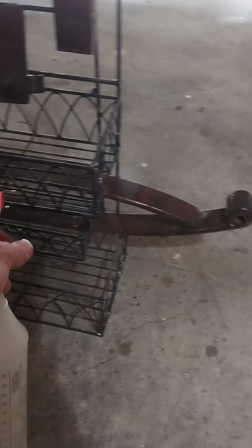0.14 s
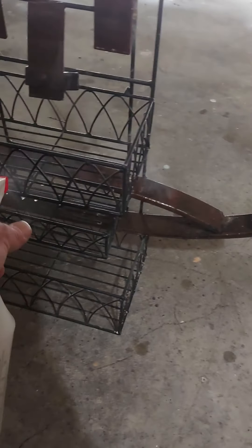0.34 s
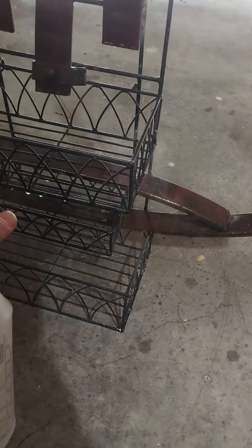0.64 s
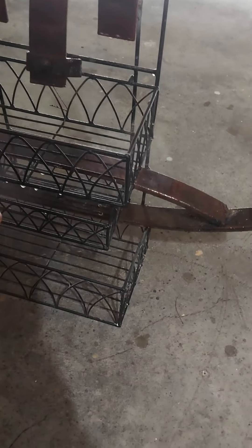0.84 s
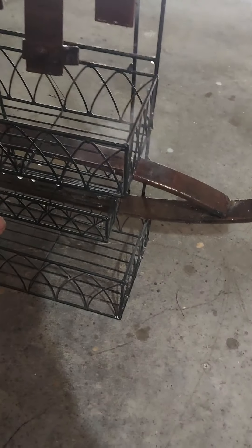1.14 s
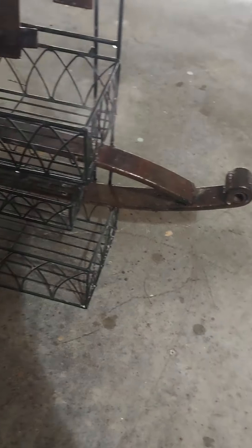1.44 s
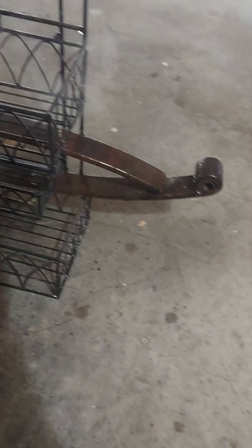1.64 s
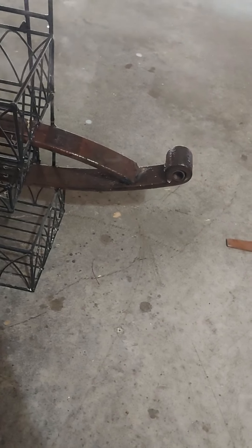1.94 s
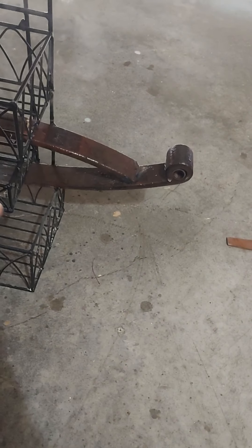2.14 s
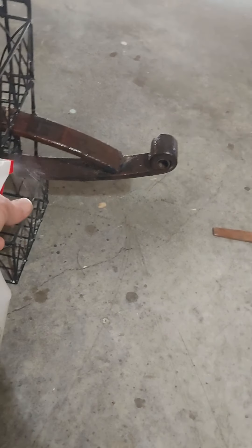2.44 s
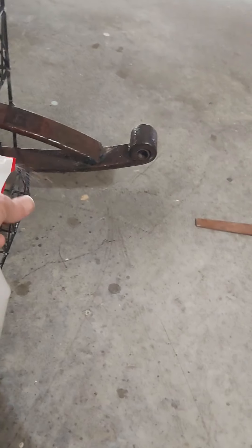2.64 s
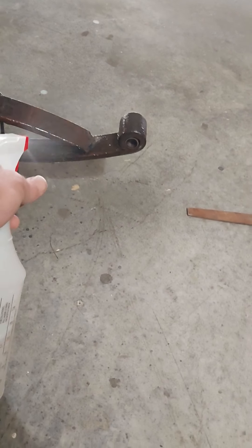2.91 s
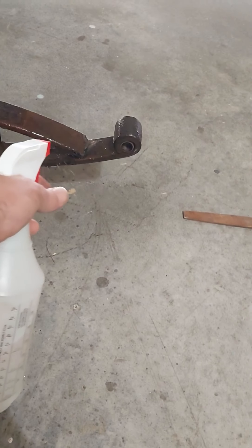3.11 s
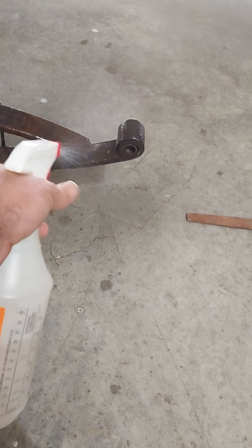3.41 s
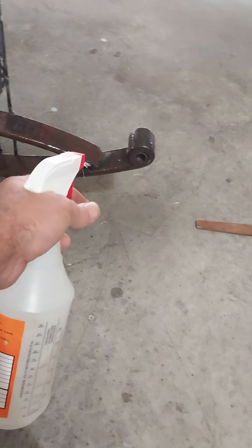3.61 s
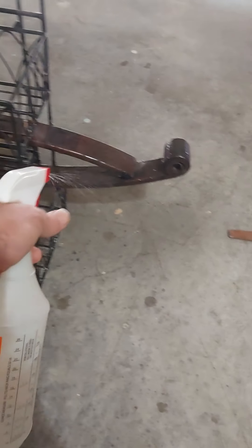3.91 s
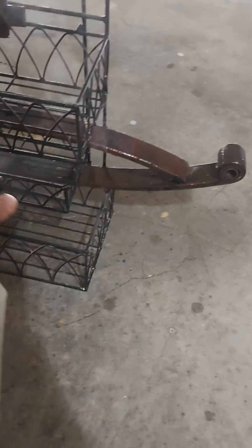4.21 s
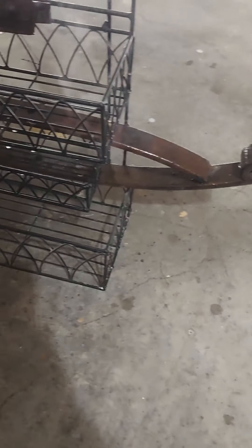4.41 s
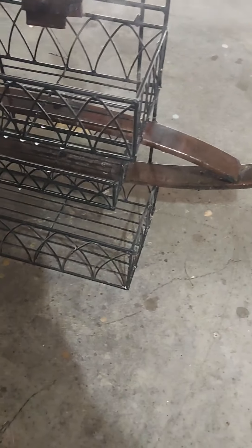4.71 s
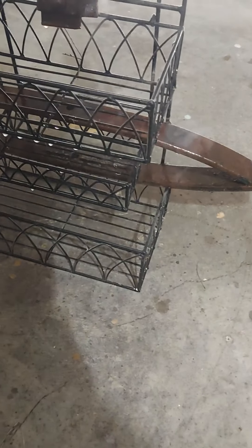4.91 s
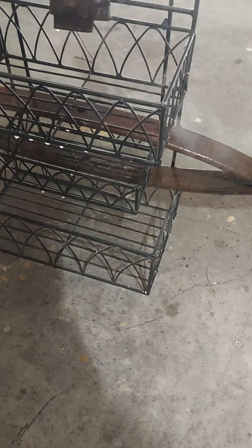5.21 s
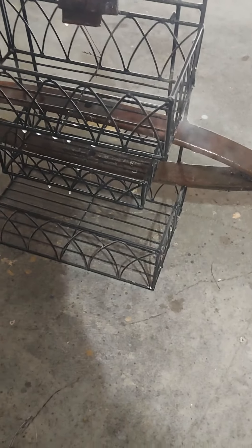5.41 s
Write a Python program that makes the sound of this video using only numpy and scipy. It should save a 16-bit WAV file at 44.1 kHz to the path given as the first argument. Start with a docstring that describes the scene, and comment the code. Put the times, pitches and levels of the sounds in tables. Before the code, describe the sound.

A plastic trigger bottle is pumped steadily, about twice a second, hissing wet bursts of mist onto steel over a faint garage hum.

```python
"""A bare garage with a concrete floor; a two-port phone is held beside a plastic trigger bottle while a motor hums.
From the start, a little over twice a second, a squeeze hisses through the nozzle, with spits as the jet starts,
at its fullest and as the pressure dies, and patters onto a steel spring. On each release the trigger clicks, the
pump slurps full, the piston knocks home and a valve ticks. Liquid sloshes now and then; the pump snaps hard near
1.9 s and 2.7 s, the second time leaving a low boom, and a faint whine follows from 3 s. All is noise and sines."""
import sys
import numpy as np
from scipy import signal
from scipy.fft import rfft, irfft, next_fast_len
from scipy.io import wavfile
from scipy.ndimage import uniform_filter1d

SR = 44100
rng = np.random.default_rng(int(sys.argv[2]) if len(sys.argv) > 2 else 0)


def unload_wav(signal):
    """Save mono or channel-first audio to the path in sys.argv[1] as 16-bit WAV at rate SR, clipped to [-1, 1]."""
    wavfile.write(
        sys.argv[1],
        SR,
        np.round(np.clip(np.atleast_2d(signal).T, -1, 1) * 32767).astype(np.int16),
    )


N = 244755  # samples
T = np.arange(N) / SR  # time [s]


def undb(db):
    """Decibels to gain."""
    return 10 ** (np.asarray(db) / 20)


def noise():
    """White noise as long as the scene."""
    return rng.standard_normal(N)


def walk(rate):
    """Smooth random wander with unit spread, drawn about rate times a second."""
    step = max(int(SR / rate), 1)
    stairs = np.repeat(rng.standard_normal(N // step + 1), step)
    wander = uniform_filter1d(stairs, step)[:N]
    return wander / wander.std()


def crackle(per_s):
    """Sparse tiny pops of random size, with unit power."""
    pops = noise() * (rng.random(N) < per_s / SR)
    return pops / pops.std()


def fade(start, t60):
    """A sudden start that dies by 60 dB in t60."""
    age = T - start
    return (age >= 0) * np.exp(-np.log(1000) * np.clip(age / t60, 0, 10))


def shape(x, points, unit=True):
    """Causal minimum-phase filter through (Hz, dB) points; with unit it keeps the power of white noise."""
    size = 4096
    hz, db = np.transpose(points)
    log_grid = np.log(np.fft.rfftfreq(size, 1 / SR) + 1)
    gain = undb(np.interp(log_grid, np.log(hz), db))
    # folding the cepstrum onto positive time makes the response causal
    cepstrum = irfft(np.log(gain))[:size // 2]
    response = irfft(np.exp(2 * rfft(cepstrum, size) - cepstrum[0]))
    if unit:
        response = response / np.linalg.norm(response)
    return signal.oaconvolve(x, response)[:N]


def band(x, low_hz, high_hz):
    """Gentle band-pass."""
    return signal.sosfilt(signal.butter(2, [low_hz, high_hz], "band", fs=SR, output="sos"), x)


def glance(x, lag_s, gain, sway):
    """A reflection off something close; its path changes as the hands move and sweeps notches through the sound."""
    late = np.interp(T - lag_s * np.exp(sway * walk(3)), T, x)
    return (x + gain * late) / np.hypot(1, gain)


# how far the right port trails the left for sound from the bottle: (frequency [Hz], lag [cycles])
PORT_LAG = [(0, 0), (800, .08), (1200, .35), (1400, .9), (2000, 1.0), (2500, 1.48), (3800, 1.6),
            (4700, 2.0), (6200, 2.2), (7000, 2.5), (8000, 2.6), (9500, 3.0), (16000, 5.0)]


def spread(make, shared):
    """Two ports hear partly the same sound, the right one a little later."""
    shared, common = np.clip(shared, 0, 1), make()
    size = next_fast_len(N)
    cycles = np.interp(np.fft.rfftfreq(size, 1 / SR), *np.transpose(PORT_LAG))
    right = irfft(rfft(common, size) * np.exp(-2j * np.pi * cycles), size)[:N]
    together = np.array([common, right])
    separate = np.array([make(), make()])
    return np.sqrt(shared) * together + np.sqrt(1 - shared) * separate


# spectrum of the room's rumble: (frequency [Hz], density [dB per Hz])
ROOM_AIR = [(20, -16), (40, -7.5), (62, -5.5), (85, 0), (130, -8), (220, -15.5), (400, -25.5), (580, -26.5),
            (800, -23), (1200, -30), (2100, -33.5), (4200, -38.5), (9500, -47), (15000, -50.5)]


def background(hum_hz=58.9, hum_db=-50.5, air_db=-58, early_db=3, wide_hz=1100, stir_db=3.0):
    """A motor hums over the room's rumble, whose low middle stirs and eases after the first seconds."""
    phase = 2 * np.pi * np.cumsum(hum_hz + .5 * walk(3.8)) / SR
    hum = np.sqrt(2) * undb(hum_db + .5 * walk(6.5)) * np.sin(phase)
    mid = shape(noise(), ROOM_AIR)
    # the ports differ only in the upper part of the rumble
    side = signal.lfilter(*signal.butter(1, wide_hz, "high", fs=SR), shape(noise(), ROOM_AIR))
    air = np.array([mid + side, mid - side])
    swell = early_db * np.interp(T, [0, .9, 1.7, 2.6], [1.1, 1.7, 2.65, 0.42]) + stir_db * walk(7.5)
    low_middle = signal.filtfilt(*signal.butter(1, [130, 1100], "band", fs=SR), air)
    return hum + undb(air_db) * (air + low_middle * (undb(swell) - 1))


# squeezes of the trigger: (time of full pressure [s], level [dB], hold [s], sag [dB per s])
SQUEEZES = [(-.02, -40.5, 0.032, 167), (0.365, -38, 0.039, 178), (0.795, -35.5, .009, 156),
            (1.245, -38.5, 0.031, 162), (1.698, -39, 0.018, 123), (2.113, -39.5, 0.024, 186),
            (2.508, -36.5, .010, 127), (2.927, -37.5, .019, 152), (3.336, -36, 0.0056, 159),
            (3.771, -37, .016, 171), (4.215, -39, 0.017, 132), (4.624, -40, 0.046, 130),
            (5.076, -40, 0.041, 172), (5.481, -38.5, 0.019, 138)]
# loud spits of liquid from the nozzle: (time [s], level [dB], 60 dB decay [s])
SPITS = [(0.332, -36, 0.078), (.480, -39, .02), (0.499, -42, 0.021), (.793, -34, .027), (2.099, -39, .02),
         (2.484, -38, .03), (2.597, -40, .018), (3.316, -41, .019), (3.750, -37.5, .018),
         (4.215, -43, 0.02), (4.332, -38.5, 0.024), (4.61, -39, .037), (4.769, -37.5, .02),
         (5.064, -33, 0.02), (5.484, -42, .027)]
# spectrum of the mist before its treble is tilted: (frequency [Hz], density [dB per Hz])
MIST = [(150, -14.5), (550, -17), (950, -8.5), (1250, -14.5), (1900, -9.5), (2600, -12), (3300, -8.5),
        (4100, -3), (5200, -7.5), (6700, -1), (7700, -3.5), (9200, -1.5), (12500, 0.5), (16000, 2)]
BUILD_S, MIST_TILT_DB = 0.044, -2  # shared by every squeeze


def spray(flutter_db=1.4, surge_db=0.76, grain_db=5.0, onset_db=21, pop_db=4.5, pop_s=0.0029,
          overshoot_db=3.0, overshoot_t60=0.094, shut_s=0.17, shut_db=250, drop_db=-4):
    """Pressure builds, holds and sags; the jet breaks into a hiss of droplets
    and spits as it starts, at its fullest and as the pressure dies."""
    flow = np.zeros(N)
    for s, db, hold, fall in SQUEEZES:
        age = T - s
        # shut_db steepens the sag, in dB per s
        sag = fall * np.maximum(age - hold, 0) + shut_db * np.maximum(age - shut_s, 0)
        # the hiss creeps up, then jumps as the outlet valve pops fully open
        creep = onset_db * np.clip(-age / BUILD_S, 0, 10) ** 1.5
        jump = pop_db * np.clip(-age / pop_s, 0, 1)
        loss = np.minimum(sag + creep + jump, 200)
        flow += undb(db - loss + overshoot_db * fade(s, overshoot_t60))
    flow = flow * undb(flutter_db * walk(220) + surge_db * walk(60))
    loud_spits = sum(undb(db) * fade(s, t60) for s, db, t60 in SPITS)
    spits = np.hypot(sputter(), loud_spits)

    def droplets():
        grains = noise() * undb(grain_db * walk(5000))
        grains = grains / grains.std() + undb(drop_db) * crackle(per_s=1300)
        hiss = shape(grains * np.hypot(flow, spits), MIST)
        # the hiss glances off the hand, then off the steel and the floor
        hiss = glance(hiss, lag_s=0.000695, gain=0.22, sway=0.247)
        hiss = glance(hiss, lag_s=.0022, gain=0.18, sway=0.069)
        hiss = glance(hiss, lag_s=.0055, gain=0.23, sway=0.0097)
        treble = signal.filtfilt(*signal.butter(2, 9000, "high", fs=SR), hiss)
        # the treble flickers
        return treble * undb(MIST_TILT_DB + walk(170)) + (hiss - treble) * undb(-MIST_TILT_DB)
    return spread(droplets, shared=0.56)


def sputter(from_s=0.075, to_s=.15, level_db=-11, scatter_db=1.5, t60=0.021, count=2):
    """Level of the small spits that come at random as the pressure dies."""
    out = np.zeros(N)
    for s, db, *_ in SQUEEZES:
        for late, size in zip(rng.random(count), rng.standard_normal(count)):
            start = s + from_s + late * (to_s - from_s)
            out += undb(db + level_db + scatter_db * size) * fade(start, t60)
    return out


def patter(delay_s=0.15, width_s=0.067, level_db=-60, low_hz=1500, high_hz=4800, splat_t60=.012):
    """The heavier drops land on the steel a moment after each squeeze."""
    landing = sum(np.exp(-((T - s - delay_s) / width_s) ** 2) for s, *_ in SQUEEZES)
    decay = np.exp(-np.log(1000) / (splat_t60 * SR))  # per sample
    splats = signal.lfilter([1], [1, -decay], np.abs(crackle(per_s=90)))
    splats = landing * splats / np.sqrt(np.mean(splats ** 2))
    return undb(level_db) * spread(lambda: band(noise() * splats, low_hz, high_hz), shared=0.47)


# releases of the trigger; the click and tick levels stand before the trim in clicks():
# (time [s], click level [dB], click treble against its middle [dB], valve tick level [dB], piston stop level [dB])
RELEASES = [(0.1521, -40, -13, -51, -45.5), (0.5629, -34, -8, -49.5, -44.5), (0.9885, -37, -6, -49.5, -43),
            (1.4349, -36.5, 6, -48.5, -43.5), (1.868, -47, 0, -50, -45), (2.2932, -42.5, 13, -60, -41.5),
            (2.7105, -36, -3, -54, -51), (3.107, -38.5, -5, -53, -44), (3.5279, -37.5, 5, -50.5, -47),
            (3.9694, -39, 0, -49, -44.5), (4.42, -40, 4, -46.5, -42.5), (4.8289, -40.5, 11, -55, -54),
            (5.2581, -44, 9, -58, -46)]
# spectrum of a plastic tick before its treble is set: (frequency [Hz], density [dB per Hz])
PLASTIC_TICK = [(300, -20), (1500, -20), (2300, -4), (3100, 7), (3700, -4.5), (4300, 3.5), (5200, -9),
                (5600, 1), (6900, 0.5), (8000, -10), (9100, 1.5), (13300, -9), (16000, -11)]
VALVE_DELAY_S, VALVE_TREBLE_DB = .136, -3  # delay after the release


def clicks(trim_db=-2, rattle_db=-13, rattle_t60=0.059, tick_t60=.011):
    """Small plastic parts let go with a dry tick and a brief rattle: first the trigger, then the valve as it seats."""
    dull, sharp = np.zeros(N), np.zeros(N)
    trigger = [(s, db, bright) for s, db, bright, _, _ in RELEASES]
    valve = [(s + VALVE_DELAY_S, db, VALVE_TREBLE_DB) for s, _, _, db, _ in RELEASES]
    for s, db, bright in trigger + valve:
        contact = np.hypot(fade(s, tick_t60), undb(rattle_db) * fade(s, rattle_t60))
        dull += undb(db - bright / 2) * contact
        sharp += undb(db + bright / 2) * contact

    def tick():
        chatter = noise()
        low = signal.lfilter(*signal.butter(1, 6000, fs=SR), chatter)
        return shape(low * dull + (chatter - low) * sharp, PLASTIC_TICK)
    return undb(trim_db) * spread(tick, shared=0.49)


# spectrum of the pump slurping full: (frequency [Hz], density [dB per Hz])
SLURP = [(150, -6), (550, -16), (900, 3.5), (1200, -4), (1700, -5), (2250, 4), (2900, -0.5), (3700, 1.5),
         (4900, -3.5), (5700, -9.5), (7700, -7.5), (10000, -12), (16000, -19.5)]
REFILL_S = .045  # time the piston takes to travel back


def refill(start_db=-57.5, swell_db=5, stop_s=0.014, start_hz=2450, rise_octaves=0.59, bubble_db=2,
           bubble_t60=0.038, scatter=0.104, pops_db=-2, count=12):
    """The spring pulls the piston back; liquid gurgles through the inlet valve in bubbles that shrink as flow grows."""
    suction = np.zeros(N)
    for s, *_ in RELEASES:
        travel = np.clip((T - s) / REFILL_S, 0, 1)
        stopping = np.exp(-np.clip((T - s - REFILL_S) / stop_s, 0, 20))
        suction += (T > s) * stopping * undb(start_db + swell_db * travel)
    age = T[:SR // 20]

    def valve():
        out = shape((.5 * noise() + undb(pops_db) * crackle(per_s=900)) * suction, SLURP)
        for s, *_ in RELEASES:
            draws = zip(rng.random(count), rng.standard_normal(count), rng.rayleigh(.7, count))
            for travel, off, size in draws:
                at = int((s + travel * REFILL_S) * SR)
                # smaller bubbles ring higher; scatter is in octaves
                hz = start_hz * 2 ** (rise_octaves * travel ** 1.55 + scatter * off)
                bubble = np.sin(2 * np.pi * hz * age) * np.exp(-np.log(1000) * age / bubble_t60)
                out[at:at + len(age)] += undb(bubble_db) * size * suction[at] * bubble
        return out
    return spread(valve, shared=0.26)


# hard snaps and thumps of the pump:
# (time [s], level [dB], dull above [Hz], body thump [dB], pump barrel ring [dB])
KNOCKS = [(1.8605, -25.5, 15600, 1, -12.5), (2.354, -50, 1500, 12.5, 2), (2.726, -24, 3600, -5.5, 2.5),
          (2.753, -48.5, 5100, 15.5, -3)]
# modes of the bottle and its spray head: (frequency [Hz], relative level [dB], 60 dB decay [s])
BOTTLE_MODES = [(213.7, -5.5, 0.061), (230, -10, 0.038), (288, -10, 0.084), (716, -11, 0.04),
                (882, -18.5, 0.057), (1420, -11.5, 0.016), (1673, -12.5, 0.037), (1890, -14.5, 0.064),
                (2060, -13, 0.037), (2215, -11, 0.041)]
# spectrum of the crack of a knock: (frequency [Hz], density [dB per Hz])
CRACK = [(150, 7), (500, -25), (800, -0.5), (1100, 0.5), (1900, -7), (2700, -2.5), (3500, 8.5), (4400, -5),
         (5500, -1), (9000, -3), (16000, -9)]
# the piston reaches its stop after each release
STOP_DELAY_S, STOP_DULL_HZ, STOP_THUMP_DB, STOP_BARREL_DB = .042, 3030, -2, 1.5
TOP_HZ = 15850  # the phone cuts above this


def knocks(chatter_s=.0035, crack_t60=0.015, crack_db=-1, modes_db=-1, body_hz=400, barrel_hz=1900):
    """Each stop, snap or thump of the pump chatters for a few milliseconds and rings the bottle."""
    out, size = np.zeros((2, N)), SR // 5
    age = T[:size]
    grit = spread(lambda: shape(noise(), CRACK), shared=0.91)
    stops = [(s + STOP_DELAY_S, db, STOP_DULL_HZ, STOP_THUMP_DB, STOP_BARREL_DB) for s, *_, db in RELEASES]
    for s, db, dull_hz, thump_db, barrel_db in stops + list(KNOCKS):
        at = int(s * SR)
        contact = np.minimum(1, np.exp(-np.log(1000) * (age - chatter_s) / crack_t60))
        hit = undb(crack_db) * contact * grit[:, at:at + size]
        for hz, mode_db, t60 in BOTTLE_MODES:
            nearness = np.exp(-(np.log2(hz / barrel_hz) / 0.44) ** 2)
            weight = thump_db * (hz < body_hz) + barrel_db * nearness
            # short waves reach the two ports out of step
            phase = rng.uniform(0, 2 * np.pi) + rng.normal(0, min(hz / 3000, 2), (2, 1))
            detune = 1 + 0.004 * rng.standard_normal()
            ring = np.sin(2 * np.pi * hz * detune * age + phase)
            # each mode builds while the chatter lasts, then rings out
            ring_out = np.exp(-np.log(1000) * (age - chatter_s) / t60)
            swell = np.minimum(np.sqrt(age / chatter_s), ring_out)
            hit = hit + undb(modes_db + mode_db + weight) * ring * swell
        dulling = signal.butter(1, min(dull_hz, TOP_HZ), fs=SR)
        out[:, at:at + size] += undb(db) * signal.lfilter(*dulling, hit)
    return out


# liquid sloshing in the bottle: (time [s], level [dB], pitch [Hz])
SLOSHES = [(0.918, -47.5, 550), (.927, -58, 930), (0.937, -49.5, 545), (.959, -50, 640), (4.382, -58, 950),
           (4.814, -56.5, 1100)]


def slosh(t60=0.041):
    """Short dull plops of the liquid, each a fading band of noise."""
    out = np.zeros(N)
    for s, db, hz in SLOSHES:
        plop = band(noise(), hz / 1.6, hz * 1.16)
        out += undb(db) * fade(s, t60) * plop / plop.std()
    return out


def boom(start=2.738, hz=139.0, db=-33, t60=0.35, build_s=0.0063, right_db=3):
    """A low ring swells and lingers after the hardest snap, stronger at the right port."""
    age = np.maximum(T - start, 0)
    swell = 1 - np.exp(-age / build_s)
    ring = undb(db) * fade(start, t60) * swell * np.sin(2 * np.pi * hz * age)
    return np.array([ring * undb(-right_db / 2), ring * undb(right_db / 2)])


# a faint whine that comes and goes in the room: (time at its loudest [s], half length [s], pitch [Hz], level [dB])
WHINES = [(3.006, 0.044, 941, -63), (3.127, 0.067, 915, -66), (4.394, 0.2, 884, -70.5)]


def whine(width_hz=45):
    """A thin, unsteady tone under the room noise: a sine multiplied by a random wander."""
    out = np.zeros(N)
    for s, length, hz, db in WHINES:
        swell = np.exp(-((T - s) / length) ** 2)
        out += undb(db) * swell * walk(width_hz) * np.sqrt(2) * np.sin(2 * np.pi * hz * T)
    return out


def garage(dry, wet_db, low_t60=0.35, high_t60=0.23, first_s=.006):
    """Concrete floor and bare walls give a short diffuse tail whose treble dies first."""
    size = SR // 2
    out = []
    for channel in dry:
        scatter = noise()
        low = signal.lfilter(*signal.butter(1, 4000, fs=SR), scatter)
        tail = low * fade(first_s, low_t60) + (scatter - low) * fade(first_s, high_t60)
        tail = tail[:size]
        out.append(signal.oaconvolve(channel, tail / np.linalg.norm(tail))[:N])
    return undb(wet_db) * np.array(out)


def scene():
    """The bottle's sounds in the garage, close to the phone, with the room behind them."""
    bottle = spray() + patter() + clicks() + refill() + slosh()
    pump_knocks = knocks()
    close = bottle + pump_knocks
    reflected = garage(bottle, wet_db=-9.0) + garage(pump_knocks, wet_db=-11)
    return close + reflected + boom() + whine() + background()


# responses of the two microphone ports: (frequency [Hz], left gain [dB], right gain [dB])
PORTS = [(107, -2.5, -2.5), (318, -5.5, -1.5), (577, -0.5, -2.5), (940, -6.5, -2.5), (1340, 2.5, 1.5),
         (2165, -1, 6), (2570, -2, 1), (7050, 3, 1), (8030, -2, 3.5), (10600, -5, -23), (10200, -3, -4.5),
         (12860, 3.5, -5.5), (15300, 4.5, 1.5)]


def record(dry):
    """Each port colours the sound in its own way; the phone cuts the top."""
    left = shape(dry[0], [(hz, left_db) for hz, left_db, _ in PORTS], unit=False)
    right = shape(dry[1], [(hz, right_db) for hz, _, right_db in PORTS], unit=False)
    top_cut = signal.ellip(12, .2, 70, TOP_HZ, fs=SR, output="sos")
    return signal.sosfilt(top_cut, np.array([left, right]))


dry = scene()
out = record(dry)
unload_wav(out)
```